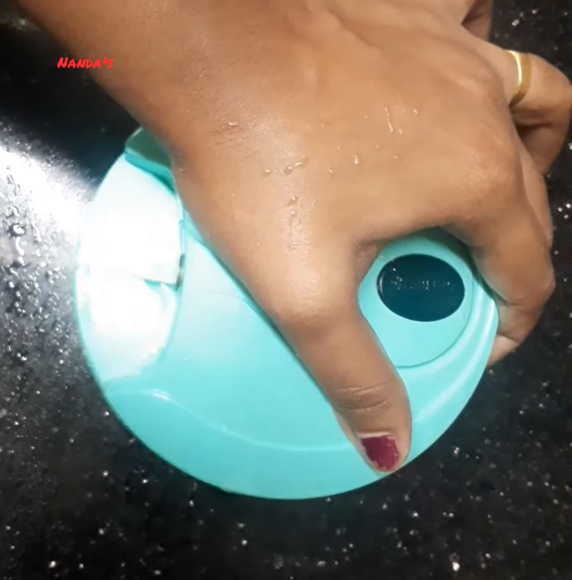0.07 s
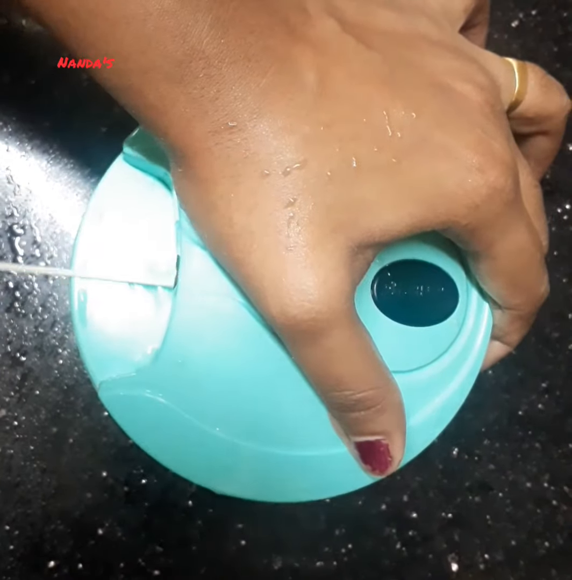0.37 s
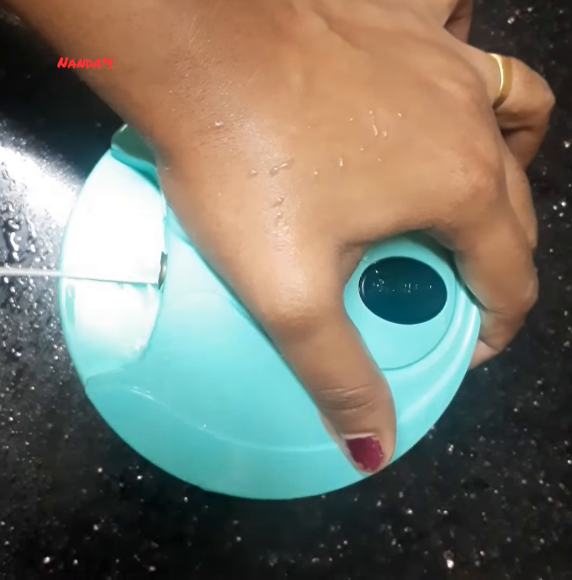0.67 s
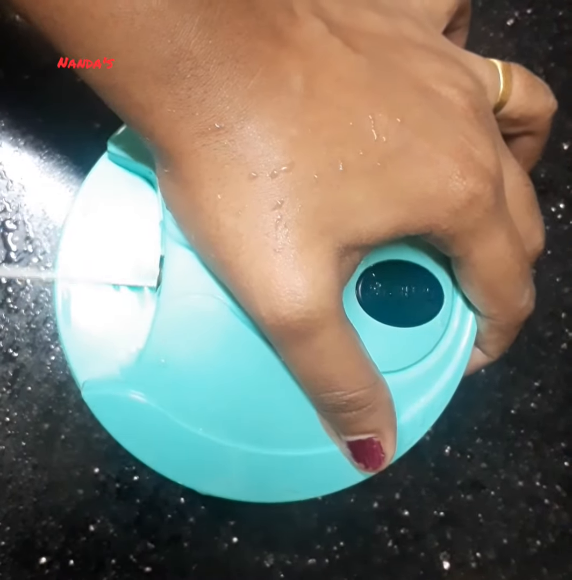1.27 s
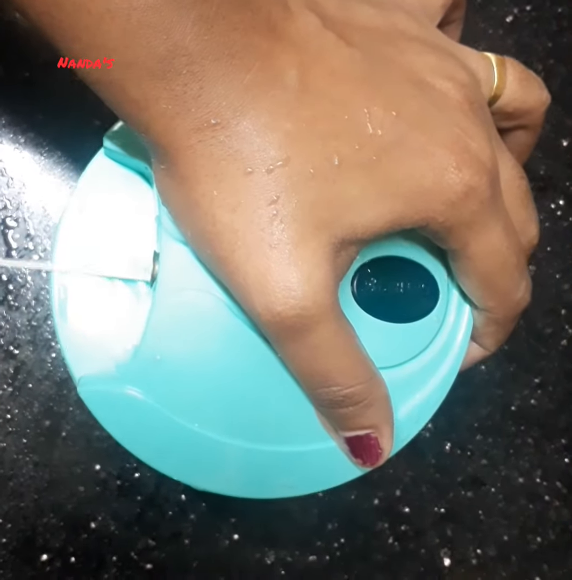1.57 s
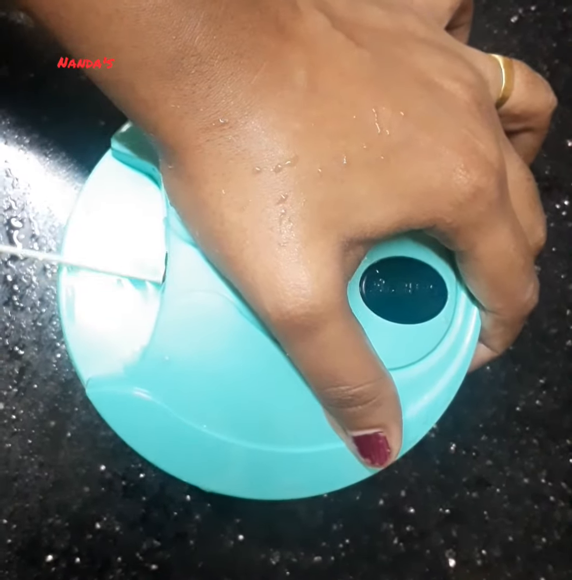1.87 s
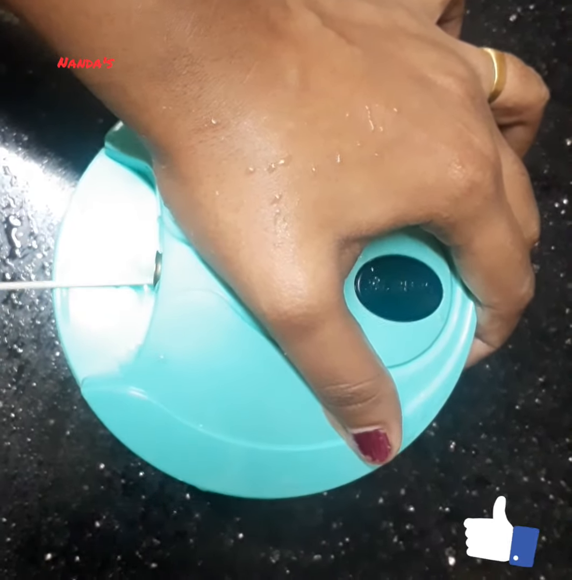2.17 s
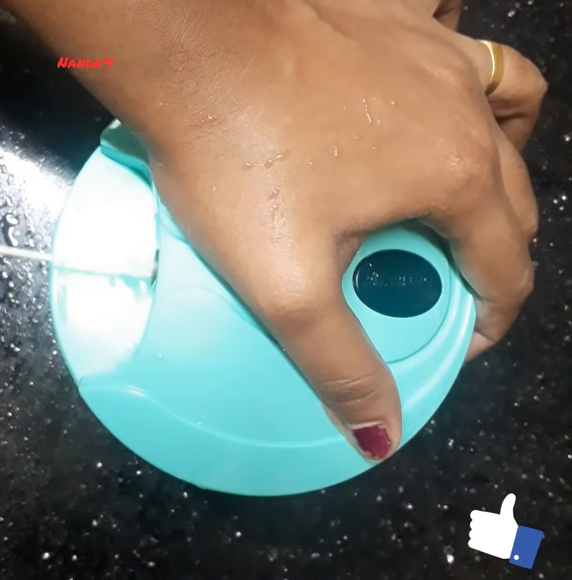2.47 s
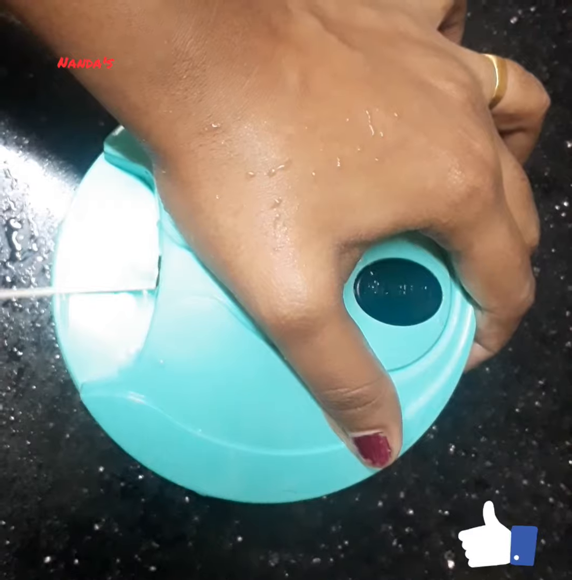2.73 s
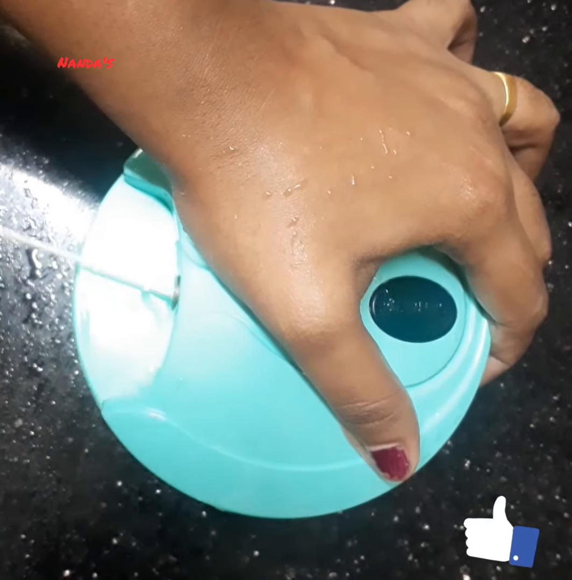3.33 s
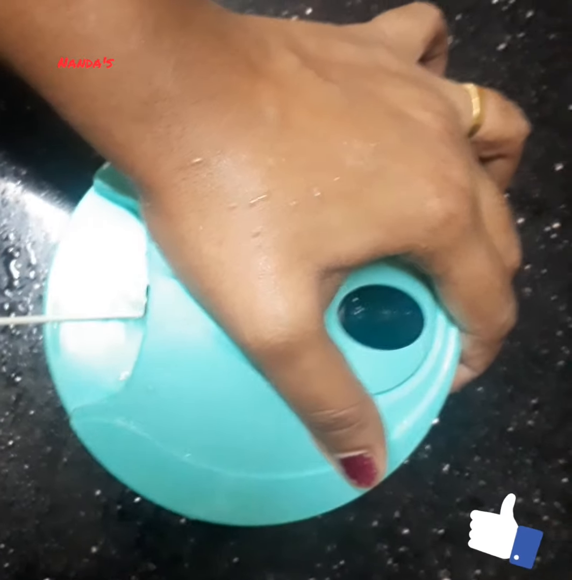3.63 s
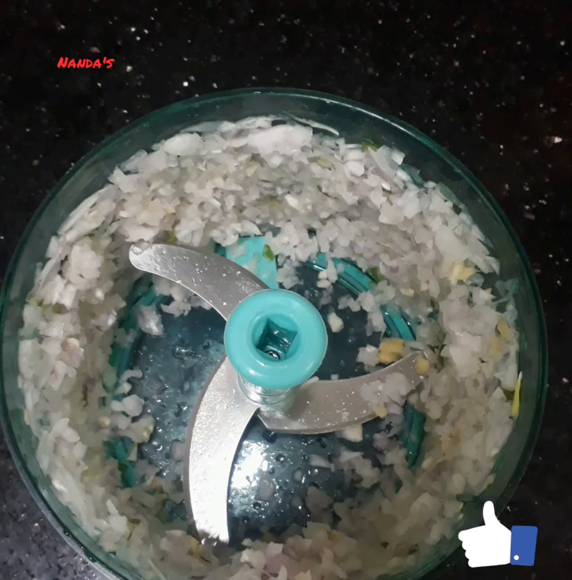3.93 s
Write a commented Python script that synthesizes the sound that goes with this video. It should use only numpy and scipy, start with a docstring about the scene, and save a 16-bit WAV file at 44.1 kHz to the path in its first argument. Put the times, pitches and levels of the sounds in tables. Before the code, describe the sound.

A pull-cord food chopper is worked close by in a small kitchen, opening with a brief bright rasp of cord reeling in. Eight pulls follow, about two a second, from 0.1 to 3.6 seconds. Each starts with a click, then food whirs, rattles and knocks against the hollow plastic bowl for a quarter second. After every pull the cord rewinds with a ratcheting rasp, the last fading by 3.9 seconds.

```python
"""A bright rasp of cord reeling in comes first; then a pull-cord food chopper is worked eight times,
close by in a small kitchen. On each pull the pawl catches and the blades fling food against the
plastic bowl, whose modes ring and drum under the impacts. Between pulls a spring rewinds the cord,
and its friction sets the lid resonating."""
import sys
import numpy as np
from scipy import signal
from scipy.fft import rfft, irfft
from scipy.io import wavfile
from scipy.ndimage import uniform_filter1d

SR = 44100
rng = np.random.default_rng(int(sys.argv[2]) if len(sys.argv) > 2 else 0)


def master_out(mix):
    """Clip the mix to full scale and print it as 16-bit PCM to the path in sys.argv[1]."""
    frames = np.transpose(np.atleast_2d(mix))
    ceiling = np.clip(frames, -1, 1)
    pcm = np.round(ceiling * 32767).astype(np.int16)
    wavfile.write(sys.argv[1], SR, pcm)


N = 176400

# Broad spectra of the bowl and the lid. Each row: frequency in Hz, spectral level in dB.
BOWL_COLOUR = [(40,-51),(62,-31),(85,-19),(140,-15.5),(260,-9),(450,-14),(720,-8.5),(1050,-11),(1250,-7),(1500,-8),(1880,0),(2270,-8),(2560,-5.5),(3030,-8),(3580,-19),(4340,-13),(5930,-22.5),(7920,-48),(9700,-56),(12000,-48),(15500,-55)]
LID_COLOUR = [(40,-52.5),(100,-33),(150,-25.5),(260,-17.5),(480,-22.5),(620,-14),(1050,-17.5),(1200,-9.5),(1500,-9),(1830,-2),(2220,-4.5),(3180,-7.5),(3580,-12.5),(4340,-9.5),(5660,-12.5),(8110,-37),(9590,-45),(12500,-34),(15500,-43)]
# Their resonances. Each row: frequency in Hz, bandwidth in Hz, gain in dB.
BOWL_MODES = [(258,28,6),(612,40,3),(1202,40,-3),(1359,30,-5),(1732,110,-3),(1865,120,-3),(3069,80,-1.5),(3340,100,-1.5)]
LID_MODES = [(262,30,3),(1202,40,-2.5),(1359,42,-5),(2380,30,1),(3069,58,-1),(3877,80,6),(4178,90,2),(4464,60,1.5),(5589,50,-4),(8630,120,0)]


def chopping(t):
    """Impact excitation: flung food drives the bowl's modes, harder as the blades gain speed."""
    # Each row: start in seconds, length in seconds, run-up in seconds, level in dB, scrape in dB.
    pulls = [(0.091,0.29,0.12,3.5,5),(0.559,0.26,0.11,2.5,6.5),(1.038,0.23,0.11,3,-7),(1.503,0.25,0.081,3,4.5),
             (1.972,0.27,0.1,-0.5,-1),(2.481,0.272,0.11,2.5,-0.5),(2.963,0.23,0.077,1,5),(3.416,0.22,0.087,0.5,-7.5)]
    hold_s, stop_s = 0.0638, 0.025
    impact_db, coast_db, scrape_db = -30, -53.5, -41
    drive, scraping = 0, 0
    for start, length, rise, db, edge_db in pulls:
        # Slack cord, run-up, full speed, slowing, stop.
        corners_s = [0, 0.224 * rise, 0.876 * rise, rise + hold_s, length, length + stop_s]
        contour_db = np.interp(t - start, corners_s, [-11.5, -13, 0, -0.5, -14, -35])
        envelope = undb(db + contour_db) * (t > start)
        drive += envelope
        scraping += envelope * undb(edge_db)
    wet_hiss = undb(-6) * noise()
    food = unit(grains(per_s=2200, scatter_db=5.5) + wet_hiss) * undb(0.22 * wander(70))
    impacts = bowl(food * (drive * undb(impact_db) + undb(coast_db)))
    scrape = unit(treble(bowl(clatter()), hz=2530))
    return impacts + undb(scrape_db) * scraping * scrape


def rewinding(t):
    """Friction excitation: the running cord rasps, sizzles and rings the lid as the ratchet ticks."""
    # Each row: start in seconds, length in seconds, share of it at full speed, level in dB,
    # ring frequency in Hz, ring bandwidth in Hz, then ring, low rasp and sizzle levels in dB.
    rewinds = [(-.16,0.24,0.41,4.5,1845,204,-5.5,1.5,-8),(0.328,0.25,0.47,.5,1860,202,-4.5,-0.5,-6),(0.801,0.22,0.5,-0.5,1860,170,-2,2,-4),(1.262,0.24,0.31,0,1847,170,-1.5,0.5,-5),(1.731,0.25,0.46,-1,1876,206,0.5,0,-2),
               (2.253,0.24,0.44,-1.5,1893,200,1,0.5,-2),(2.72,0.24,0.5,0.5,1830,200,-6.5,-1,-4),(3.18,0.25,0.44,-0.5,1850,171,-0.5,-0.5,-4),(3.651,0.29,0.14,-1,2310,446,-4.5,-2,-2)]
    # Each row: centre in Hz, bandwidth in Hz, level in dB.
    sizzle_bands = [(11700,600,-6),(12920,190,0),(14400,2000,-5)]
    jolt_s, jolt_share, run_up_s, fall_db = 0.006, 0.38, 0.0088, -19
    rubbing = undb(4.5) * noise()
    friction = unit(grains(per_s=900, scatter_db=-0.5) + rubbing) * undb(0.43 * wander(180))
    speed, ring, brightness, low_gain, sizzle_gain = 0, 0, 0, 0, 0
    for start, length, full_share, db, hz, width, ring_db, low_db, sizzle_db in rewinds:
        age = np.maximum(t - start, 0)
        slowing = np.clip((age / length - full_share) / (1 - full_share), 0, 4) ** 1.58
        rising = (1 - np.exp(-age / jolt_s)) * (1 - (1 - jolt_share) * np.exp(-age / run_up_s))
        envelope = rising * undb(db + fall_db * slowing)
        speed += envelope
        brightness += envelope * (1 - np.exp(-age / jolt_s))
        low_gain += envelope * undb(low_db)
        sizzle_gain += envelope ** 2 * undb(sizzle_db)
        tone = unit(resonance(resonance(friction, hz, width), hz, 3 * width))
        # The ring fades a little more slowly than the rasp.
        ring += rising * undb(db + ring_db + 0.95 * fall_db * slowing) * tone
    ratchet = undb(-5.5) * speed * unit(treble(lid(clatter()), hz=2750))
    rubbed_lid = lid(friction)
    rasp = low_gain * rubbed_lid + (speed - low_gain) * treble(rubbed_lid, hz=1500) + ratchet
    rasp += treble(rasp, hz=6500) * (brightness ** 0.14 - 1)  # a slow cord sounds duller
    sizzle = unit(sum(undb(db) * unit(resonance(resonance(noise(), hz, width), hz, 4 * width))
                      for hz, width, db in sizzle_bands))
    return undb(-27.5) * rasp + undb(-28) * ring + undb(-50.5) * sizzle_gain * sizzle


def pawl(t):
    """Impulsive loading: the cord snaps taut and the pawl rattles home, shaking bowl and lid."""
    # Each row: start in seconds, level in dB.
    catches = [(0.095,-3),(0.559,-0.5),(1.03,-1),(1.5,1.5),(1.963,-4.5),(2.487,-0.5),(2.955,-1.5),(3.408,-1),(3.61,-1)]
    force = sum(undb(db) * pulse(t - start, rise_s=0.0006, decay_s=0.0095) for start, db in catches)
    rattle = force * grains(per_s=2300, scatter_db=-0.5)
    return undb(-25.5) * (bowl(rattle) + undb(-1) * lid(force * noise()))


def knocking(t):
    """Brief impacts have broad spectra: the plastic cracks, sometimes dull and sometimes bright."""
    # Each row: start in seconds, level in dB, relative treble in dB.
    knocks = [(.105,-1,-3),(0.256,-3,1),(0.267,-1,-4),(.625,-5,1),(0.661,-4,4),(0.683,4,-6),(.806,1.5,-6),(1.383,1,2),(1.502,-6,2),(1.579,-1,0),(1.605,6,-12),(1.87,-7,6),
              (2.013,5,-14),(2.067,-2,0),(2.102,3,-3),(2.136,4,-5),(2.172,3,-7),(2.493,-6,3),(2.652,-1,4),(2.686,1,1),(3.079,5,-7),(3.322,-3,4),(3.409,1,-8),(3.464,1,-16),(3.49,5,-16),(3.555,-6,2),(3.661,-1,-6)]
    blow, crack = 0, 0
    for start, db, treble_db in knocks:
        envelope = undb(db) * pulse(t - start, rise_s=0.0007, decay_s=0.0034)
        blow += envelope
        crack += envelope * undb(treble_db)
    bright = treble(plastic(crack * np.sign(noise()), BOWL_COLOUR, LID_MODES), hz=3350)
    dull = bowl(blow * np.sign(noise()))
    return undb(-24) * dull + undb(-11) * bright


def drumming(t):
    """Forced resonance: the bowl's lowest mode swells as the blades drag, over a faint rumble."""
    # Each row: time of the peak in seconds, level in dB.
    drags = [(.115,-5),(.16,-4),(.29,2),(.36,-10),(.58,-10),(.635,2),(.708,-4),(1.14,-4),(1.195,-3),(1.25,-11),(1.595,-5),(1.668,1),(2.085,-5),(2.497,-5),(2.62,0),(2.7,-1),(3.14,-6),(3.215,-10),(3.425,-4),(3.57,-4)]
    mode_hz, swell_s, decay_s = 258, 0.02, 0.008
    drag = sum(undb(db) * np.exp(-((t - peak) / swell_s) ** 2) for peak, db in drags)
    retained = np.exp(-1 / (decay_s * SR))
    swell = signal.lfilter([1 - retained], [1, -retained], drag)
    pitch_hz = mode_hz * (1 + 0.018 * wander(50))
    tone = unit(np.sin(2 * np.pi * np.cumsum(pitch_hz) / SR))
    rumble = unit(resonance(resonance(noise(), hz=156, width=24), hz=133, width=54))
    return undb(-35.3) * swell * tone + undb(-62) * rumble


def bowl(x):
    """Resonant filtering of an excitation by the bowl."""
    return plastic(x, BOWL_COLOUR, BOWL_MODES)


def lid(x):
    """Resonant filtering of an excitation by the lid."""
    return plastic(x, LID_COLOUR, LID_MODES)


def plastic(x, colour, modes, size=4096):
    """Modal superposition: ringing modes add to a broad response, scaled to unit energy."""
    hz, db = np.array(colour).T
    freqs = np.maximum(np.fft.rfftfreq(size, 1 / SR), 1)
    bass_rolloff = np.minimum(freqs / hz[0], 1)
    magnitude = undb(np.interp(np.log(freqs), np.log(hz), db)) * bass_rolloff
    # Folding the cepstrum gives a causal, minimum-phase response.
    cepstrum = irfft(np.log(magnitude))
    cepstrum[1:size // 2] *= 2
    cepstrum[size // 2 + 1:] = 0
    response = irfft(np.exp(rfft(cepstrum)))
    response += sum(undb(gain_db) * resonance(response, centre, width)
                    for centre, width, gain_db in modes)
    return signal.fftconvolve(x, response / np.linalg.norm(response))[:N]


def early_reflections(x, reflection=0.55):
    """Short echoes from the nearby counter smear the chopping and the rewinding rasp in time."""
    # Each entry: echo delay in milliseconds.
    delays_ms = (.43, .79, 1.27)
    for ms in delays_ms:
        taps = np.r_[reflection, np.zeros(int(ms * SR / 1000)), 1]
        x = signal.lfilter(taps, taps[::-1], x)  # all-pass: the spectrum keeps its shape
    return x


def kitchen(x, t60_s=0.16, delay_s=0.0015, reverb_db=-8.5):
    """Reverberation: reflections from counter and walls die away exponentially."""
    t = np.arange(SR // 2) / SR
    tail = noise()[:len(t)] * undb(-60 * t / t60_s) * (t > delay_s)
    return x + undb(reverb_db) * signal.fftconvolve(x, tail / np.linalg.norm(tail))[:N]


def grains(per_s, scatter_db):
    """Shot noise: tiny impacts of uneven size at random moments."""
    impulses = (rng.random(N) < per_s / SR) * np.sign(noise())
    return unit(impulses * undb(scatter_db * np.minimum(noise(), 2)))


def clatter(per_s=100, decay_s=0.001):
    """A jittered pulse train: each tick is a damped noise burst of its own size."""
    phase = np.cumsum(per_s * np.exp(0.3 * wander(per_s))) / SR
    size = undb(4 * np.clip(noise(), -2, 1.2))[phase.astype(int)]
    age = (phase % 1) / per_s
    return unit(size * np.exp(-age / decay_s) * np.sign(noise()))


def pulse(age, rise_s, decay_s):
    """The envelope of a damped impact: a quick rise, then exponential decay."""
    age = np.maximum(age, 0)
    return (1 - np.exp(-age / rise_s)) * np.exp(-age / decay_s)


def resonance(x, hz, width):
    """A damped resonator with gain 1 at its centre and a bandwidth in Hz."""
    return signal.lfilter(*signal.iirpeak(hz, hz / width, fs=SR), x)


def treble(x, hz):
    """Zero-phase high-pass filtering."""
    return signal.sosfiltfilt(signal.butter(2, hz, "high", fs=SR, output="sos"), x)


def wander(per_s):
    """Smooth random fluctuation with rms 1."""
    step = int(SR / per_s)
    held = np.repeat(noise()[:N // step + 1], step)
    return unit(uniform_filter1d(held, step)[:N])


def noise():
    """White noise."""
    return rng.standard_normal(N)


def unit(x):
    """Scale to rms 1."""
    return x / np.sqrt(np.mean(x ** 2) + 1e-18)


def undb(db):
    """Decibels to amplitude gain."""
    return 10 ** (np.asarray(db) / 20)


def scene():
    """Superposition: pulls and rewinds alternate, and all the sources share one small room."""
    t = np.arange(N) / SR
    smeared = early_reflections(chopping(t) + rewinding(t))
    return kitchen(smeared + pawl(t) + knocking(t) + drumming(t))[None]


def record(dry, stop_s=3.943, top_hz=15600):
    """Band limiting: a steep low-pass removes the top, and the sound stops just before the end."""
    lowpass = signal.ellip(10, 0.2, 80, top_hz, fs=SR, output="sos")
    return signal.sosfilt(lowpass, dry * (np.arange(N) / SR < stop_s))


dry = scene()
out = record(dry)
master_out(out)
```